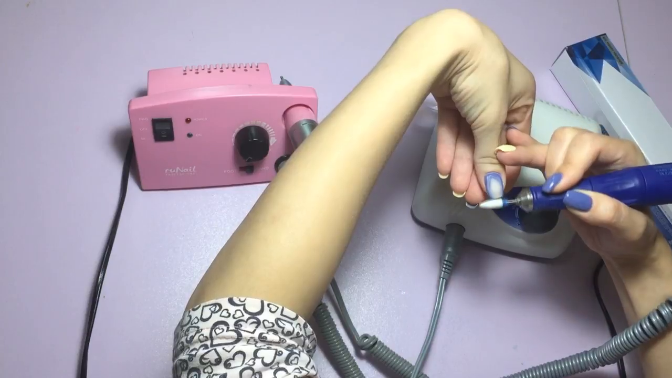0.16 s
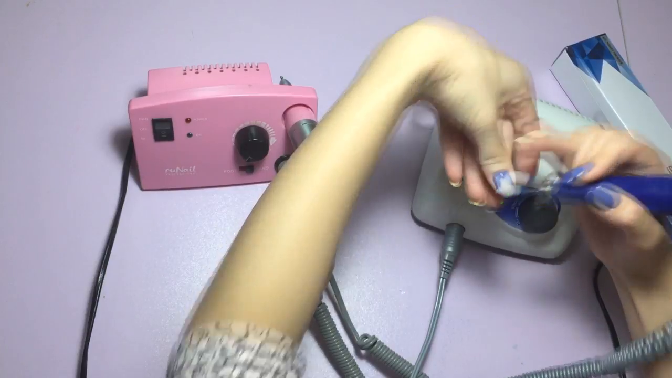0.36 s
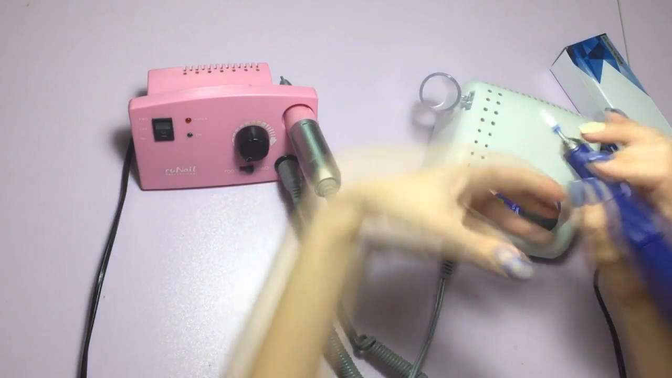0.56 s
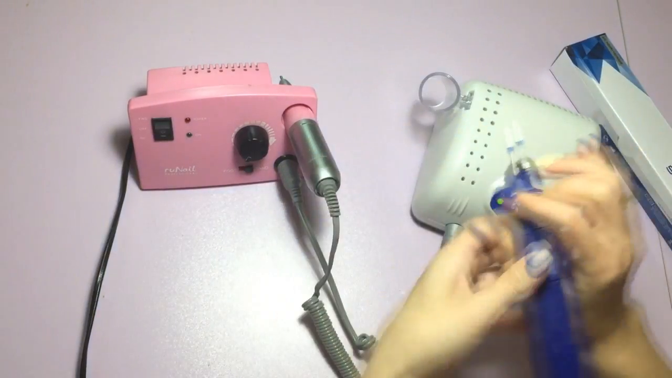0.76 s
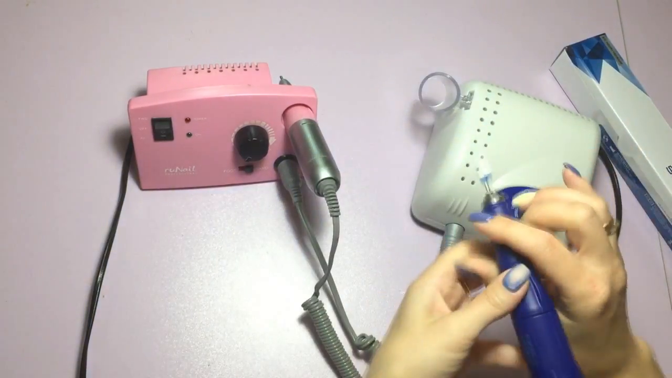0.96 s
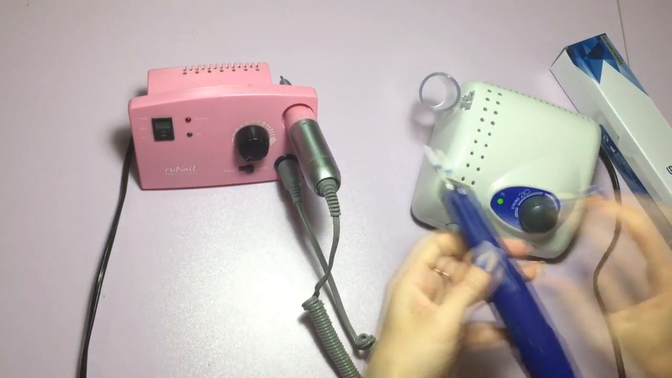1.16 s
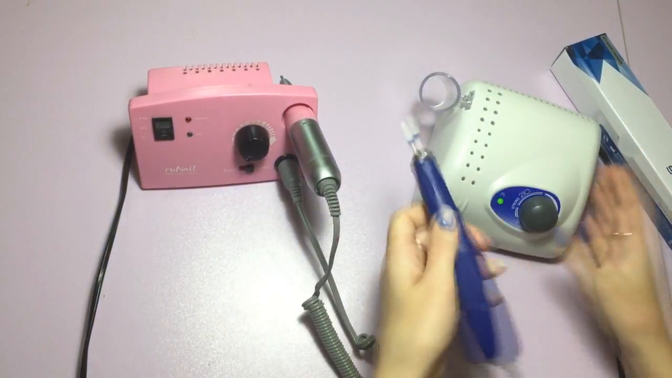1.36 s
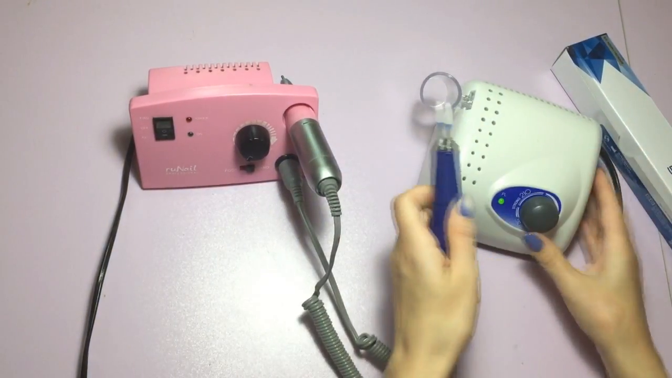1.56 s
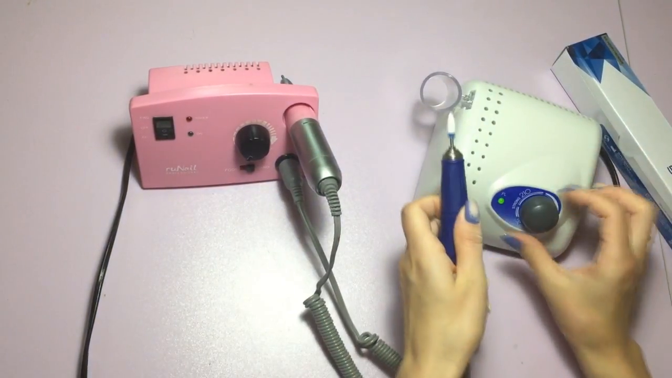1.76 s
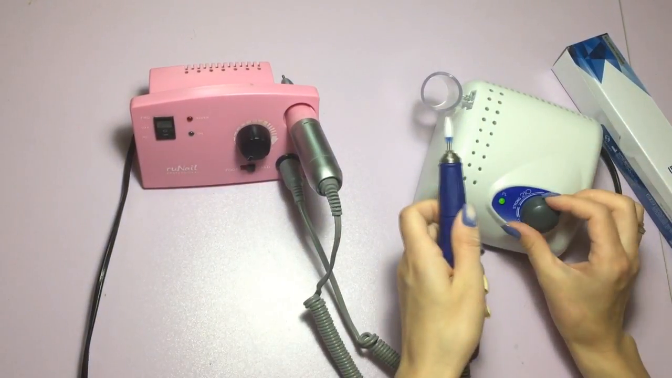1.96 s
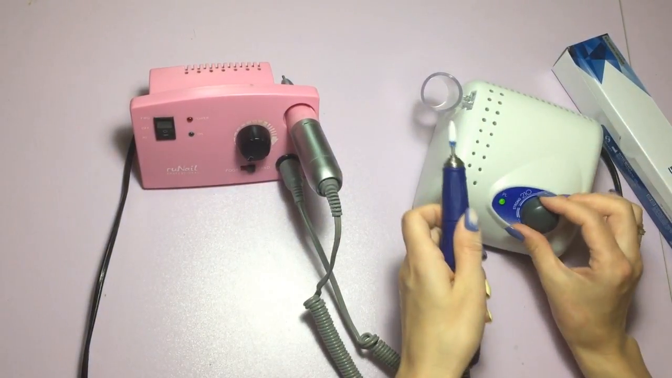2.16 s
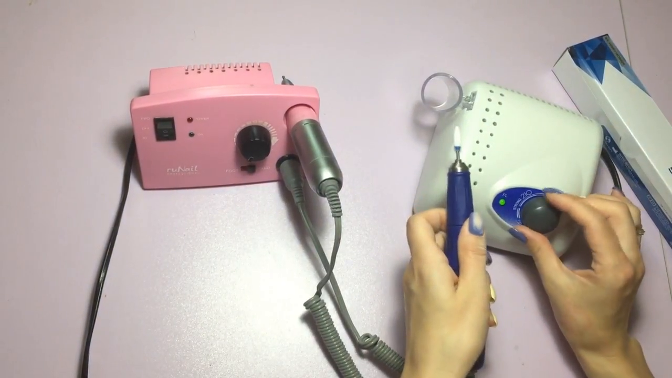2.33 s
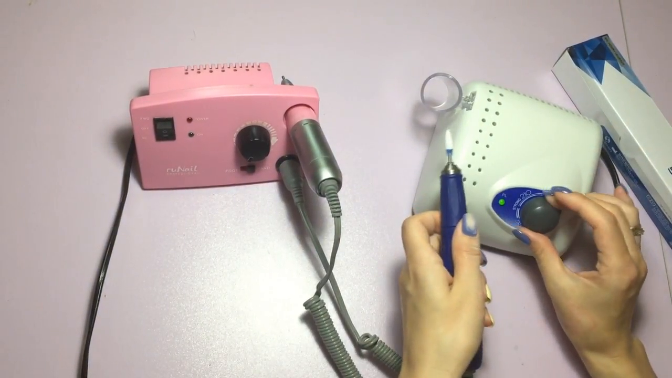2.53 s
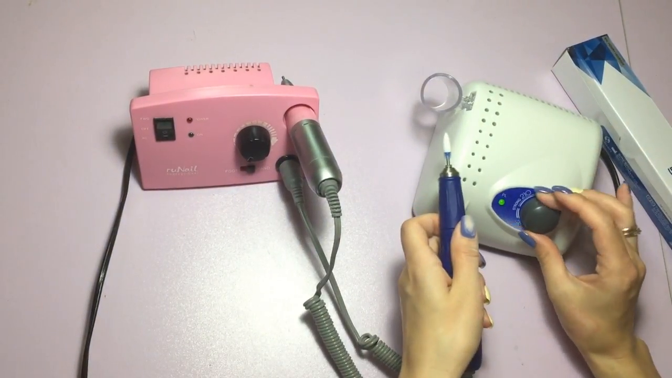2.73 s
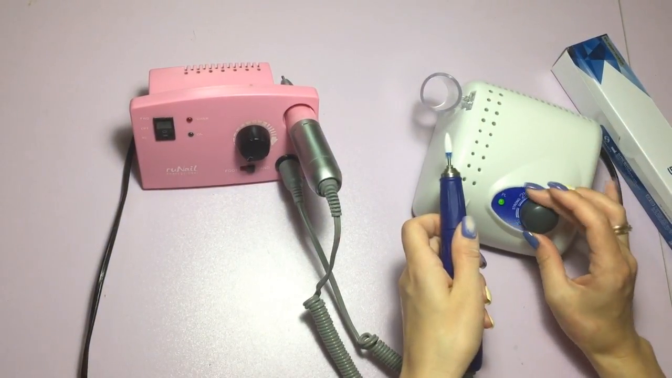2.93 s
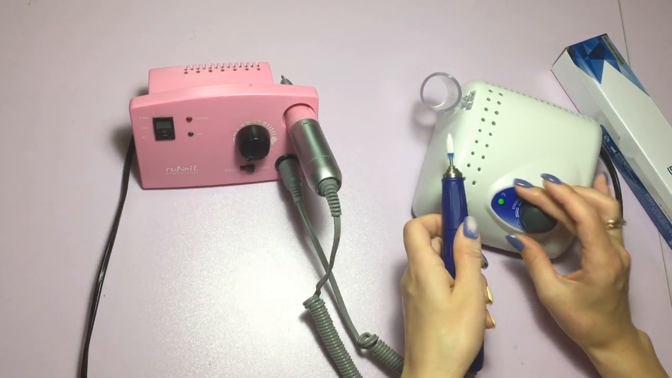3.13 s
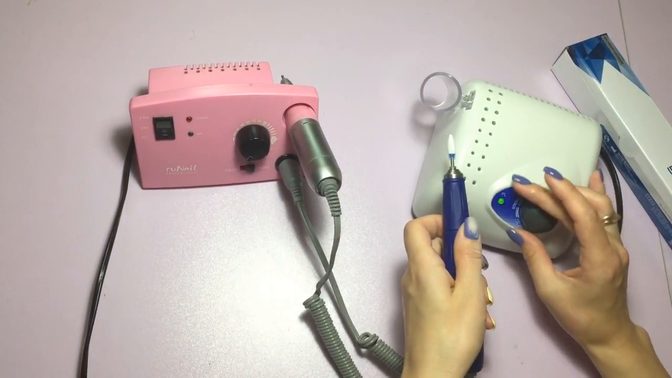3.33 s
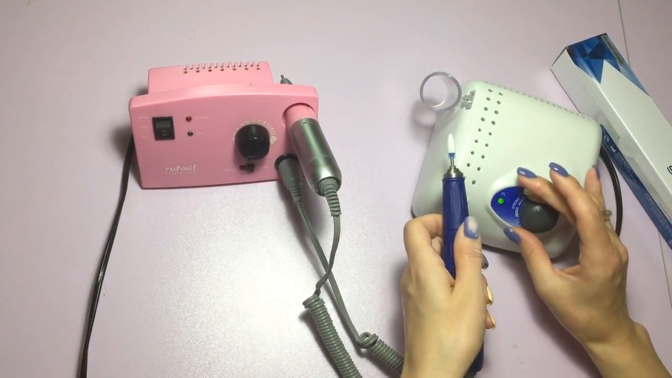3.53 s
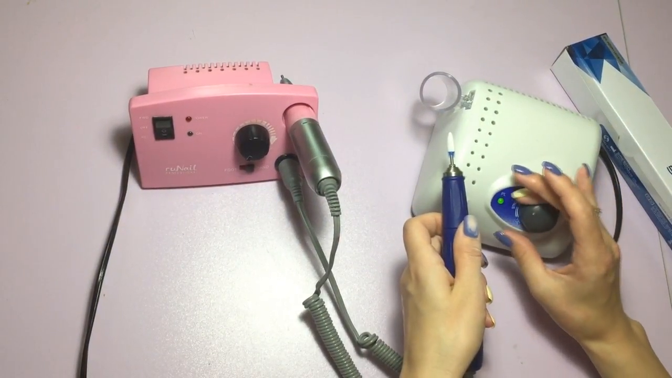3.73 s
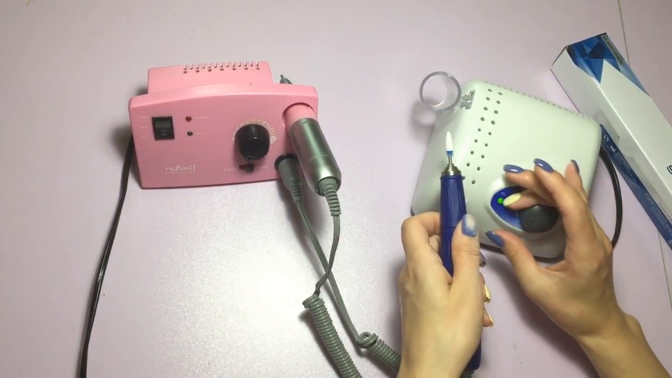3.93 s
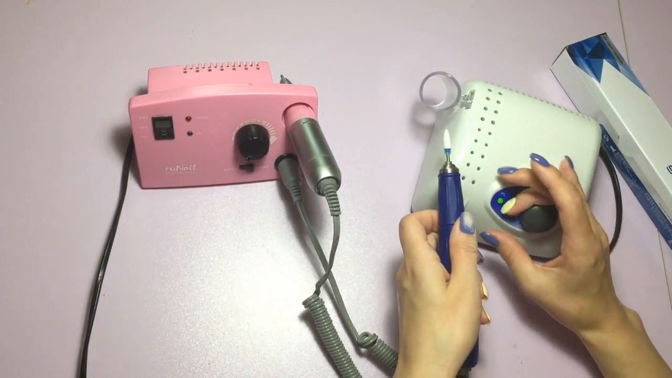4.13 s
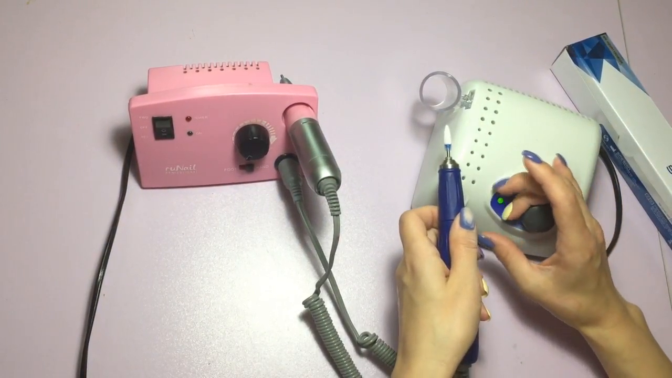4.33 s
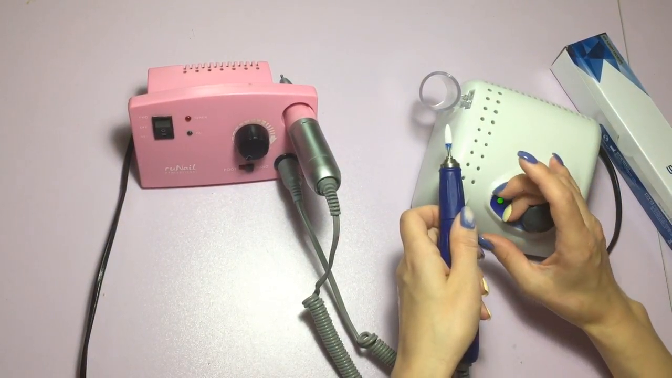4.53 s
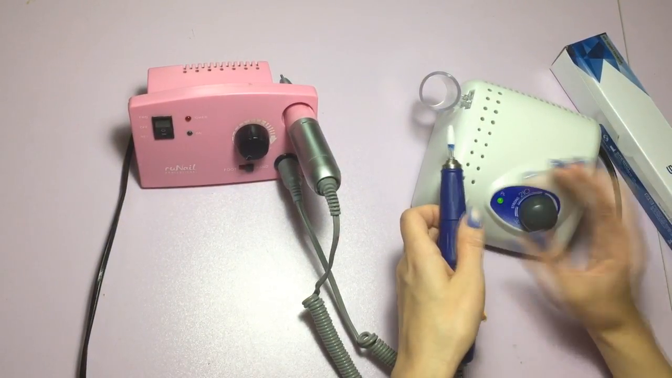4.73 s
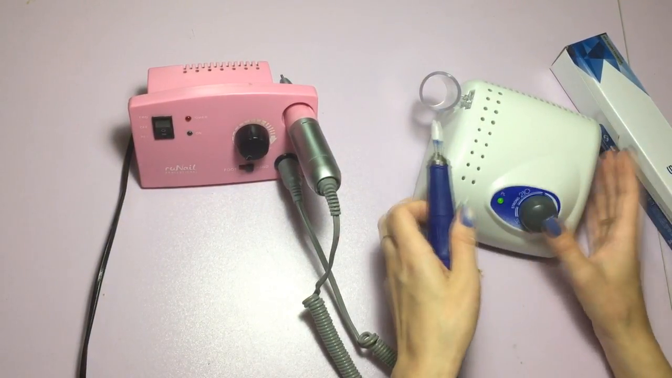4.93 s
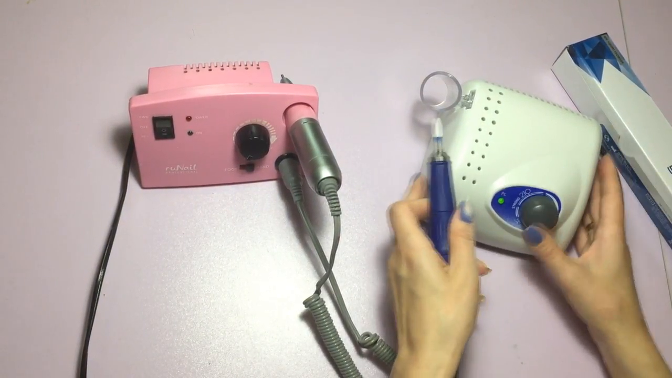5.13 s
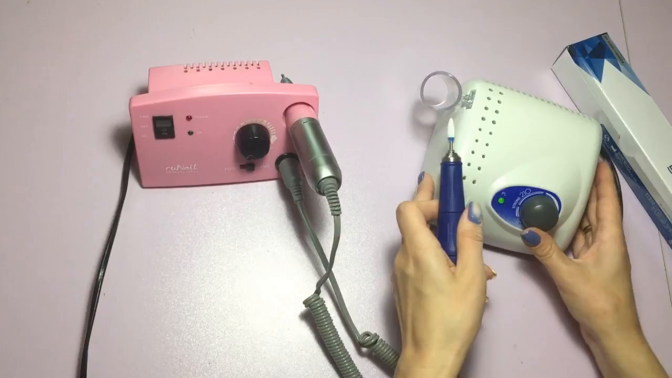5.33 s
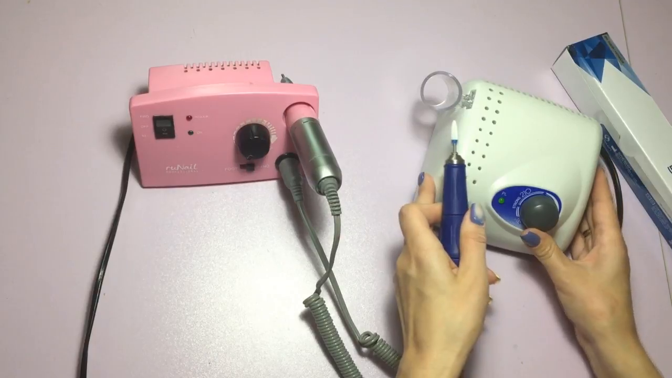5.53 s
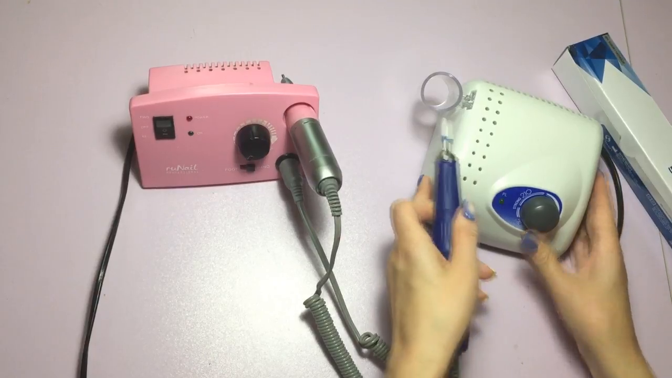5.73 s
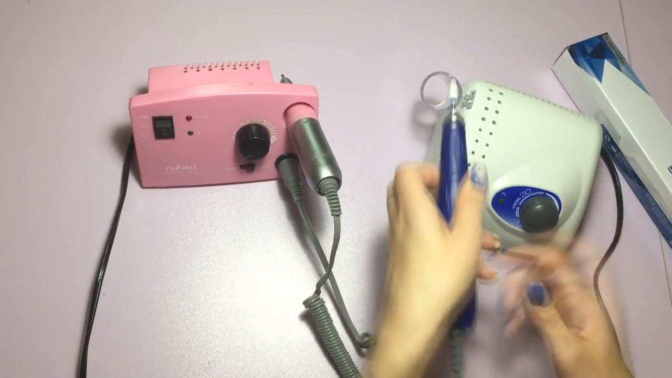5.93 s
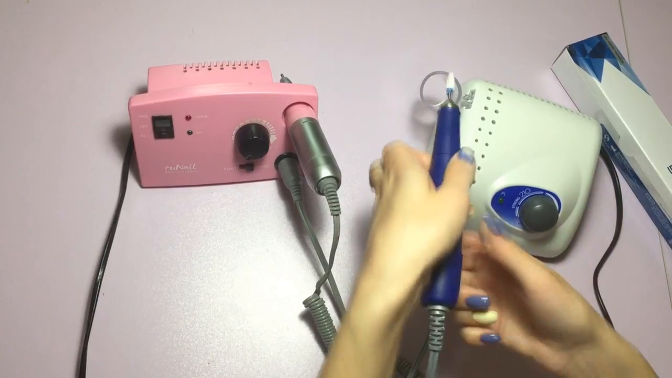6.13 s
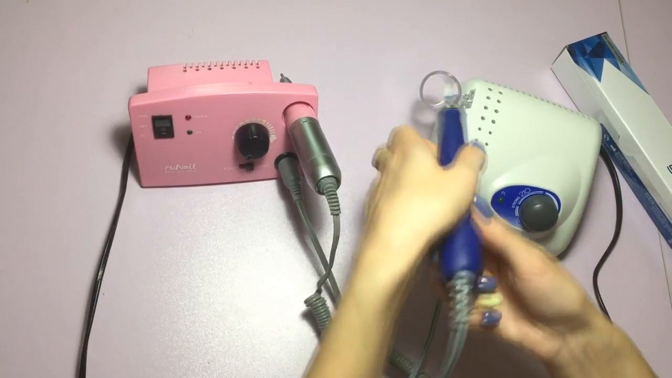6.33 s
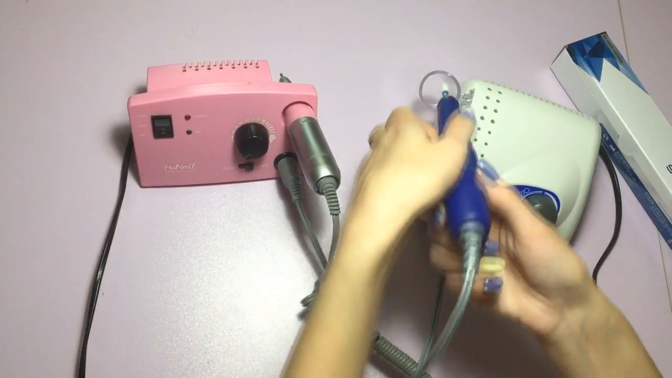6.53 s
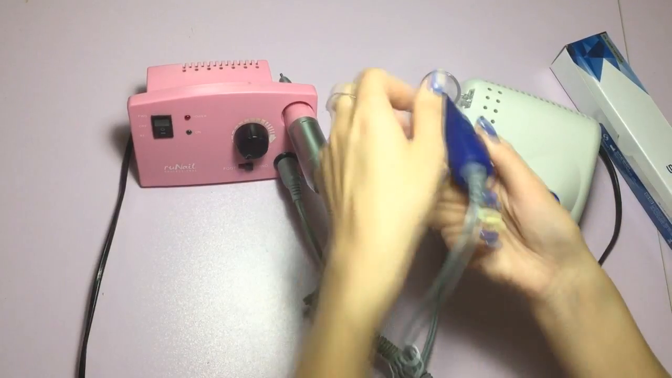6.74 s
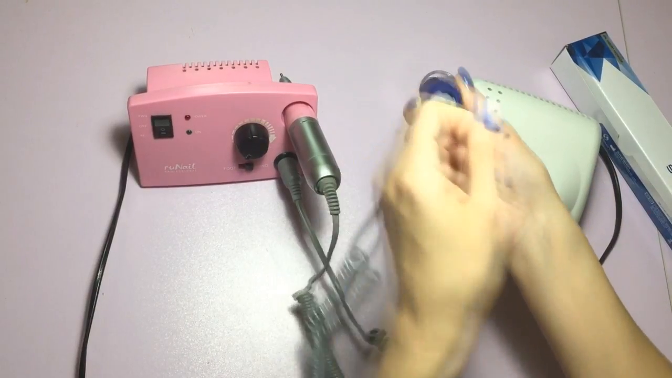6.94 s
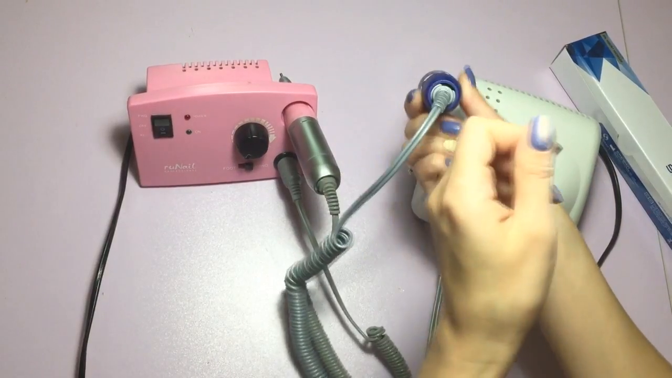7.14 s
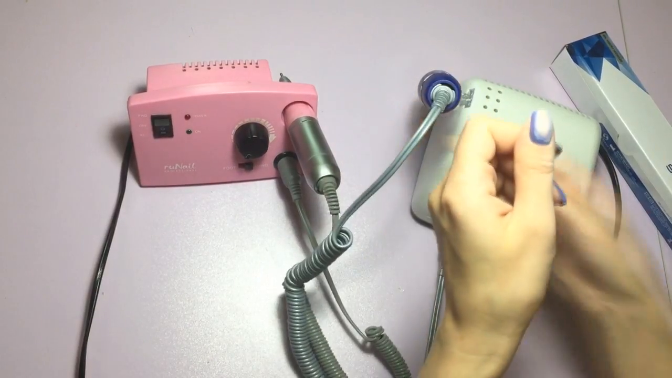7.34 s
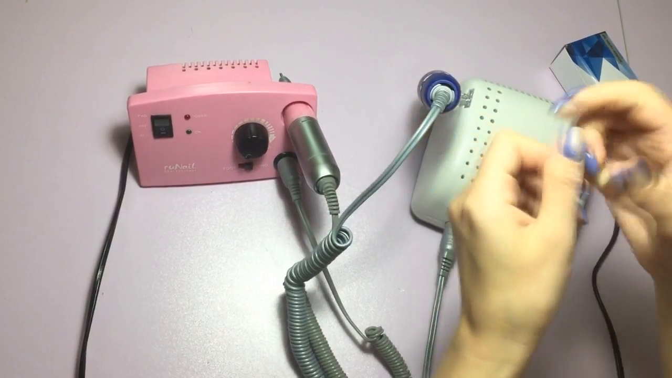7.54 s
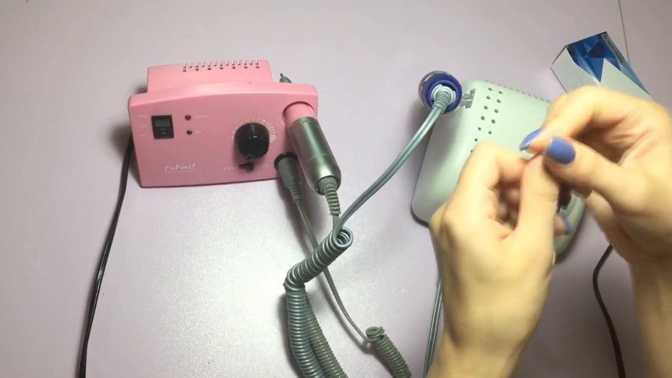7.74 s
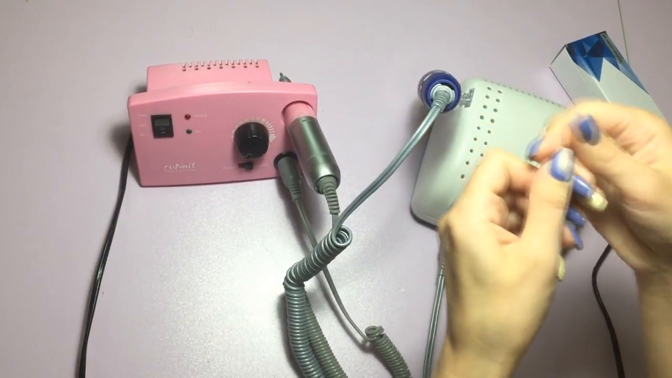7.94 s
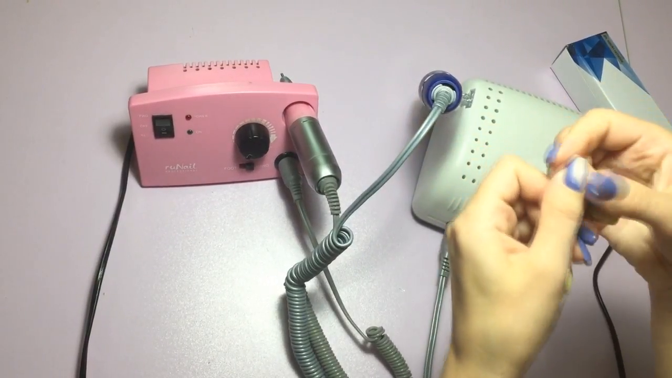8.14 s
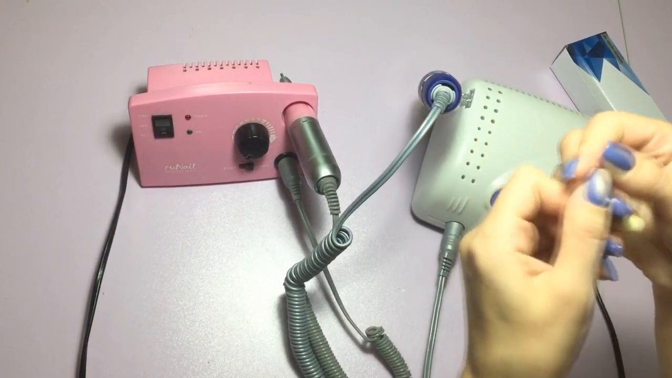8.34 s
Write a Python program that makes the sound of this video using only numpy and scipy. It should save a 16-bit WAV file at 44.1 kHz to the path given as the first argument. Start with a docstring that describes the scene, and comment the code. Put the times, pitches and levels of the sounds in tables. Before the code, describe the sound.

Close to the microphone in a small room, a nail drill whines at high speed, its bit briefly rasping on a nail. It spins freely, then slows in a long falling tone, with a switch click near the end. The handpiece taps against a plastic box on a desk and is pushed into its holder with hollow knocks and a short scrape. Fingers tick softly over faint mains hum and hiss.

```python
"""Nail drill on a desk

Close to a mono camera microphone in a small room, a nail drill whines: its bit grinds a nail briefly,
it runs free, then coasts to a stop, shaft tones and bearing noise sounding through shell and nose.
A switch snaps, the handpiece is knocked and slid into the cradle of its plastic box, and fingers tick.
The room answers the handling; mains hum and hiss lie underneath."""
import sys
import numpy as np
from scipy import signal
from scipy.fft import rfft, irfft, next_fast_len
from scipy.io import wavfile
from scipy.ndimage import uniform_filter1d

SR = 44100
rng = np.random.default_rng(int(sys.argv[2]) if len(sys.argv) > 2 else 0)


def to_wav(sig):
    """Store sig (one row per channel, or 1-D mono) as 16-bit WAV at the path in sys.argv[1].

    Samples outside -1..1 are clipped; the rate is SR.
    """
    pcm = np.clip(np.atleast_2d(sig), -1, 1) * 32767
    pcm = np.round(pcm).astype(np.int16)
    wavfile.write(sys.argv[1], SR, pcm.T)  # frames by channels


N = 374409
T = np.arange(N) / SR

# Modes of the desk, the plastic box and the handpiece shell.
# Each row: frequency in Hz, relative level in dB, t60 in seconds before added damping.
DESK_MODES = [(55, -18, 0.1), (138, -1.5, 0.14), (180, -0.5, 0.11), (244.3, -2, 0.14), (320, -2, 0.13)]
BOX_MODES = [(433, -4, 0.061), (577, 2.5, 0.1), (787, 2.5, 0.017), (932, -5.5, 0.11)]
SHELL_MODES = [(1189, 6, 0.03), (1330, 6.5, 0.028), (1629, -3, 0.18), (1860, -5.5, 0.065),
               (2122, -1.5, 0.038), (2510, -8, 0.1), (2970, -3.5, 0.024), (3420, -7, 0.12),
               (3990, -9, 0.039)]


def amp(db):
    """Decibels to amplitude."""
    return np.exp(np.asarray(db) * (np.log(10) / 20))


def unit(x):
    """x at rms 1."""
    return x / np.sqrt(np.mean(x ** 2) + 1e-20)


def along(points, hz):
    """Read (Hz, value) points on a log axis."""
    f, v = np.transpose(points)
    return np.interp(np.log(hz + 1), np.log(f + 1), v)


def curves(rows):
    """One value per sample for each column after the time."""
    s, *cols = np.transpose(rows)
    return [np.interp(T, s, c) for c in cols]


def bump(s, width):
    """A bell-shaped envelope centred on s."""
    return np.exp(-.5 * ((T - s) / width) ** 2)


def wobble(rate, size=N):
    """A random curve, rate knots a second."""
    knots = rng.standard_normal(int(size * rate / SR) + 2)
    return np.interp(T[:size] * rate, np.arange(len(knots)), knots)


def filtered(x, response):
    """x times a response of frequency."""
    m = next_fast_len(len(x) + 8192)
    return irfft(rfft(x, m) * response(np.fft.rfftfreq(m, 1 / SR)), m)[:len(x)]


def coloured(x, spectrum):
    """x through a spectrum that keeps white noise at its level."""
    scale = np.sqrt(np.mean(amp(along(spectrum, np.linspace(0, SR / 2, 4096))) ** 2))
    return filtered(x, lambda hz: amp(along(spectrum, hz)) / scale)


def band(lo_hz, hi_hz, size=N):
    """Noise of rms 1 with soft band edges."""
    edges = lambda f: 1 / np.sqrt((1 + (lo_hz / (f + 1)) ** 4) * (1 + (f / hi_hz) ** 4))
    return unit(filtered(rng.standard_normal(size), edges))


def patchy(spread_db):
    """White noise with patches of random gain."""
    z = signal.stft(rng.standard_normal(N + 512), nperseg=512)[2]
    field = uniform_filter1d(uniform_filter1d(rng.standard_normal(z.shape), 6, 0), 8, 1)
    return unit(signal.istft(z * amp(spread_db * unit(field)), nperseg=512)[1][:N])


def scattered(multiples, trend, spread_db=3.5):
    """Rows (multiple, dB, ..) lying at random about a trend."""
    k, *cols = np.transpose(trend)
    db = np.transpose([np.interp(multiples, k, c) for c in cols])
    return np.c_[multiples, db + spread_db * rng.standard_normal((len(multiples), 1))]


def order(multiple, db, speed, flicker_db=3.5):
    """A flickering sine locked to the shaft, muted above about 16 kHz; db is its rms."""
    turns = np.cumsum(speed) / SR
    heard = multiple * speed < SR / 2.7
    level = np.sqrt(2) * amp(db + flicker_db * wobble(9, len(speed)))
    return heard * level * np.sin(2 * np.pi * (multiple * turns + rng.random()))


def shaft_tones(speed, stages_hz):
    """The whine: tones at multiples of the shaft speed, their balance shifting as it slows."""
    # Prominent orders, and the trend of the rest. Each row: multiple, relative dB at each stage.
    prominent = [(1, -22, -34, -33), (2, -30, -25, -47), (3, -28, -16, -24), (4, -22, -22, -23),
                 (5, -30, -40, -24), (6, -21, -33, -27), (7, -31, -32, -24), (8, -23, -23, -33),
                 (9, -19, -27, -29), (10, -12, -15, -30), (11, -23, -21, -33), (12, -20, -22, -47),
                 (21, -20, -17, -20), (33, -18, -18, -23), (35, -15, -15, -25), (37, -21, -21, -21),
                 (42, -19, -19, -22), (43, -15, -15, -22), (49, -22, -22, -22), (55, -20, -20, -20)]
    trend = [(13, -25, -24, -35), (26, -24, -22, -35), (28, -20, -20, -35), (45, -22, -22, -30),
             (47, -27, -27, -26), (80, -27, -27, -25), (96, -33, -33, -33)]
    # A part turning at a third of the shaft speed. Each row: multiple, relative dB.
    third_trend = [(8.3, -26), (11.3, -26), (12.3, -20), (19.7, -22), (21, -28), (26.7, -28)]
    # The 10th order swells and recedes. Each row: time in seconds, change in dB.
    whistle = [(.3, -0.5), (.65, 1.5), (.9, 0), (1.25, 5.5), (1.7, -2), (2, -7.5), (2.7, -7), (3.3, 3.5),
               (3.5, 6.5), (3.75, -11)]
    others = np.setdiff1d(np.arange(trend[0][0], trend[-1][0] + 1), [row[0] for row in prominent])
    tones, end = np.zeros(N), len(speed)
    for k, *stage_db in [*prominent, *scattered(others, trend)]:
        db = np.interp(speed, stages_hz[::-1], stage_db[::-1])
        if k == 10:
            db += curves(whistle)[0][:end]
        tones[:end] += order(k, db, speed)
    fast = np.clip((speed - 500) / 60, 0, 1)
    last = np.count_nonzero(fast)
    for k, db in scattered([n / 3 for n in range(25, 81) if n % 3], third_trend):
        tones[:last] += fast[:last] * order(k, db, speed[:last], flicker_db=4)
    return tones


def drill():
    """Bearing noise and shaft tones shake the shell, the nose and the air around the bit."""
    # The shaft: loaded by the nail, free, turned down. Each row: time in seconds, turns a second.
    shaft_speed = [(0, 585.8), (.15, 581.7), (.27, 583.1), (.51, 595.6), (.69, 599), (2.1, 600.6),
                   (2.31, 598), (2.49, 592.5), (2.67, 576.3), (2.85, 549.5), (3.03, 516.1), (3.39, 445.4),
                   (4.35, 264.7), (4.83, 178.6), (5.22, 112.4), (5.45, 76.6), (5.75, 30)]
    # Shaft speeds in Hz of three stages: full, slowing, slow.
    stages_hz = [550, 400, 250]
    # Lift of tones over noise. Each row: dB at each stage; first for shell and nose, then for hiss.
    lift = [
        [0, 0, 0],
        [0, 5, 9.5],
    ]
    # The level falls with speed. Each row: shaft Hz, then shell, nose and hiss in dB.
    rundown = [(45, -83, -80, -78.5), (99, -72, -73.5, -73), (134, -70.5, -73, -73), (166, -60, -66.5, -72),
               (192, -55.5, -59.5, -65), (266.4, -46, -55, -58.5), (325, -42.5, -50.5, -57),
               (420, -42, -46.5, -55.5), (500, -34, -45.5, -48.5), (600, -33, -43, -43.5)]
    # The hand turns the drill. Each row: time in seconds, change of shell, nose and hiss in dB.
    hold = [(0, -4, 1, 1.5), (.11, -4.5, -2, 3.5), (.31, -6, -5, -3), (.52, -6, -.5, -1), (.99, -3, -.5, 2),
            (1.31, -2.5, -0.5, -1.5), (1.39, -4, -1.5, 0), (1.67, -.5, 0.5, -1.5), (2.01, 0.5, 1.5, -1)]
    # Each row: time in seconds, share held low over the desk from 0 to 1.
    lowering = [(0, 0), (1.5, 0), (1.64, 1), (5.75, 1)]
    # Spectra of the radiating parts. Each row: frequency in Hz, relative level in dB.
    shell_raised = [(350, -62.5), (600, -28), (919, -22.5), (1180, -4.5), (1500, -2.5), (1740, 1.5),
                    (2390, 3.5), (2590, 1), (3480, 0.5), (3760, -1), (5000, -5), (6500, -78), (11000, -120)]
    shell_lowered = [(350, -71.5), (600, -32.5), (833, -26.5), (1360, -11), (1560, -11), (1850, 0),
                     (2080, -8.5), (2330, -3.5), (2780, -3.5), (3070, 2.5), (3480, 1.5), (3830, -6.5),
                     (5000, -18), (6500, -65.5), (11000, -120)]
    shell_coasting = [(350, -54), (600, -50), (769, -13), (943, -24), (1010, -6), (1100, -12), (1390, -2.5),
                      (1650, -2.5), (1820, 9), (2210, -0.5), (3440, 6.5), (4500, -14.5), (5000, -46),
                      (6500, -66), (11000, -120)]  # only its hollows ring
    metal_nose = [(2880, -24), (4900, -6.5), (5230, 3.5), (5660, 6), (5880, 3.5), (6170, 5), (6340, -6.5),
                  (6600, 0.5), (7650, -2), (8790, -14.5), (9300, -23), (12100, -49.5), (20500, -120)]
    fast_hiss = [(5180, -30), (8800, 3), (9690, 3.5), (10400, 0.5), (11400, 2.5), (13200, -1.5),
                 (14900, -4.5), (15900, -1.5)]
    slow_hiss = [(5180, -51.5), (8800, -16), (9200, 2.5), (10200, -1), (12700, 1), (13800, 4), (15100, 4.5),
                 (15900, 7.5)]
    # The 21st order sings out twice. Each row: centre and width in seconds, level in dB.
    late_whine = [(4.57, 0.085, -64), (5.337, 0.092, -71.5)]

    stop_s = 5.66
    end = round(stop_s * SR)
    shaft = curves(shaft_speed)[0]
    speed = shaft[:end]
    hz, *fall_db = np.transpose(rundown)
    shell_db, nose_db, hiss_db = (np.interp(shaft, hz, db) + held
                                  for db, held in zip(fall_db, curves(hold)))
    body_lift_db, air_lift_db = (np.interp(shaft, stages_hz[::-1], row[::-1]) for row in lift)

    tones = shaft_tones(speed, stages_hz)
    gliding = np.clip((590 - shaft) / 60, 0, 1)
    tones = (1 - gliding) * tones + gliding * resonances(tones)
    bearings = patchy(spread_db=1.5) * amp(0.13 * wobble(24.93))
    shake = bearings + amp(body_lift_db) * tones
    stir = bearings + amp(air_lift_db) * tones

    low = curves(lowering)[0]
    slow = np.clip((480 - shaft) / 140, 0, 1)
    shell = np.sqrt(1 - low) * coloured(shake, shell_raised)
    shell += np.sqrt(low * (1 - slow)) * coloured(shake, shell_lowered)
    shell += np.sqrt(slow) * coloured(shake, shell_coasting)
    air = np.sqrt(1 - slow) * coloured(stir, fast_hiss) + np.sqrt(slow) * coloured(stir, slow_hiss)
    out = amp(shell_db) * shell + amp(nose_db) * coloured(shake, metal_nose)
    out += amp(hiss_db + 0.99 * wobble(12)) * air
    whine = sum(amp(db) * bump(s, width) for s, width, db in late_whine)
    out[:end] += whine[:end] * order(21, 0, speed, flicker_db=1.5)
    return out * (T < stop_s) + grinding(speed) + rasp_swells(bearings)


def resonances(x, ripple_db=4, step_hz=250):
    """Gliding tones flare and sink through broad peaks and many small, random treble resonances."""
    # Each row: frequency in Hz, gain in dB.
    peaks = [(500, -8), (750, 2), (1100, -2), (1300, 6), (1480, 8), (1650, -4), (3600, -7), (4300, -1),
             (4700, -5), (5300, 0), (6000, -3), (8000, 0), (16000, 1)]
    knots = rng.standard_normal(int(SR / 2 / step_hz) + 2)
    ripple = lambda hz: np.clip(hz / 4000, 0, 1) * np.interp(hz / step_hz, np.arange(len(knots)), knots)
    return filtered(x, lambda hz: amp(along(peaks, hz) + ripple_db * ripple(hz)))


def grinding(speed):
    """The flutes of the bit strike the nail in step with the shaft and throw off dust."""
    # Each row: time in seconds, then low, middle and high flute tones and dust hiss in dB.
    cut = [(0.0, -46, -50.5, -53.5, -46), (0.042, -37.5, -40.5, -53, -46.5), (0.15, -41.5, -34, -31.5, -38),
           (0.188, -49.5, -36, -30.5, -38.5), (0.26, -51.5, -30.5, -36.5, -39.5),
           (0.296, -53.5, -55, -35.5, -46), (0.31, -52, -60.5, -49, -61), (0.34, -58, -61, -56, -59.5)]
    # Each row: multiple of the shaft speed, dB relative to its group.
    flutes = [(5, -1.5), (7, -8), (9, -4), (10, -12), (11, -8), (12, -7.5), (13, -19), (15, -14.5),
              (16, 2.5), (17, -6), (18, -18.5), (19, -18.5), (20, -0.5), (21, -11.5), (22, -15.5),
              (23, -16), (24, -15.5), (25, -9), (26, -21), (27, -18)]
    *group_db, dust_db = curves(cut)
    out, end = amp(dust_db) * band(6000, 15000), len(speed)
    for k, db in flutes:
        group = np.searchsorted([10.5, 18.5], k)
        out[:end] += amp(group_db[group][:end]) * order(k, db, speed)
    return out * np.clip((cut[-1][0] - T) / .03, 0, 1)


def background():
    """Hiss, wavering mains hum and, later, rustling hands and sleeves."""
    # Each row: frequency in Hz, level in dB (relative for the hiss).
    hiss_spectrum = [(12, -51.5), (20, -18.5), (44, -9), (101, -1), (172, -10), (203, 1.5), (227, -10),
                     (301, -6), (327, -10.5), (398, -8), (470, -11.5), (4280, -20), (15900, -32)]
    mains = [(48.4, -85), (199.2, -79), (301.5, -80), (398.4, -80.5), (500.6, -89.5), (592.2, -88)]
    # Each row: centre and width in seconds, dull and bright noise in dB.
    rustles = [(6.263, 0.037, -95, -74), (6.512, 0.034, -75, -72.5), (6.594, 0.014, -60, -94.5),
               (6.682, 0.044, -76, -87.5), (7.492, .06, -67, -81.5), (7.69, 0.0069, -73.5, -73.5),
               (7.74, 0.087, -75, -102), (7.889, .08, -84, -78), (8.45, .05, -76.5, -78.5)]
    dull, bright = band(390, 1700), band(5000, 15000)
    hands = sum(bump(s, width) * (amp(dull_db) * dull + amp(bright_db) * bright)
                for s, width, dull_db, bright_db in rustles)
    hum = sum(np.sqrt(2) * amp(db + 1.5 * wobble(12)) * np.sin(2 * np.pi * (hz * T + rng.random()))
              for hz, db in mains)
    return amp(-68.5) * coloured(patchy(spread_db=1.8), hiss_spectrum) + hum + hands


def rasp_swells(noise):
    """Narrow bands of the rasp swell briefly as the hand turns."""
    # Each row: centre and width in seconds, centre and width in Hz, level in dB.
    swells = [(0.603, 0.14, 2630, 290, -46), (1.66, 0.025, 3860, 449, -43.5), (3.84, 0.038, 5980, 200, -46)]
    out = 0
    for s, width, hz, width_hz, db in swells:
        narrow = unit(filtered(noise, lambda f: np.exp(-.5 * ((f - hz) / width_hz) ** 2)))
        out += amp(db) * bump(s, width) * narrow
    return out


def ring(modes, t, tilt_db=0):
    """A struck body: its modes decay from new strengths and phases, tilted by tilt_db an octave."""
    middle = np.mean([np.log2(hz) for hz, _, _ in modes])
    out = 0
    for hz, db, t60 in modes:
        gain = amp(db + tilt_db * (np.log2(hz) - middle) + rng.normal(0, 2.2))
        cycles = hz * t * rng.normal(1, 0.015) + rng.random()
        out += gain * amp(-60 * t / t60) * np.sin(2 * np.pi * cycles)
    return out


def contacts():
    """Soft bumps ring box and desk, knocks add the shell and a snap; fingers and switch tick dryly."""
    # Bumps of hand and cord. Each row: start in seconds, box and desk in dB.
    thumps = [(0.712, -47, -44), (1.269, -54.5, -52.5), (2.075, -47, -56.5), (5.193, -53, -69)]
    # Each row: start in seconds, box, desk, shell and snap in dB, hand damping in dB per 10 ms.
    knocks = [(4.813, -50, -77.5, -45, -70, 7.5), (5.689, -44.5, -35.5, -38.5, -26, 4.5),
              (5.843, -47.5, -62, -63, -86, 8), (5.898, -52, -47, -64, -85, 11),
              (5.918, -59, -75, -65, -90, 7), (6.504, -78, -72, -65, -76.5, 7),
              (6.563, -77, -68, -62, -81, 1), (6.593, -65.5, -70, -57, -85, 3),
              (6.771, -70, -54.5, -61.5, -76, 6), (6.822, -22, -19.5, -26.5, -61.5, 0.9),
              (6.968, -29, -41, -30.5, -58.5, 3), (7.031, -35.5, -48.5, -43, -62, 4.5),
              (7.054, -38.5, -51.5, -42.5, -65, -1.5), (7.127, -17.5, -31.5, -26.5, -44.5, 7),
              (7.142, -25.5, -32, -23, -45, 13), (7.165, -44.5, -26, -34.5, -49.5, 3)]
    # Each row: start in seconds, bright and dull noise in dB.
    finger_ticks = [(7.6884, -56, -65), (7.7283, -60, -71), (7.8535, -57.5, -76), (8.4515, -47, -46),
                    (8.4614, -62.5, -49)]
    # The knob's switch, with the first knock: level in dB, band edges in Hz, t60 in seconds.
    switch = (-37, 1500, 3300, .018)
    out, t = np.zeros(N + SR), T[:SR // 3]
    rise = lambda seconds: 1 - np.exp(-t / seconds)
    decay = lambda t60: amp(-60 * t / t60)
    noise = lambda lo_hz, hi_hz: band(lo_hz, hi_hz, len(t))

    def add(s, sound):
        out[round(s * SR):][:len(t)] += sound

    for s, box_db, desk_db in thumps:
        thump = amp(box_db) * ring(BOX_MODES, t) + amp(desk_db) * ring(DESK_MODES, t)
        add(s, thump * rise(0.00077) * decay(0.063))
    for s, box_db, desk_db, shell_db, snap_db, damp_db in knocks:
        box = amp(box_db) * ring(BOX_MODES, t) * rise(0.0006)
        desk = amp(desk_db) * ring(DESK_MODES, t, tilt_db=0.5) * rise(0.0086)
        tilt_db = 0.5 + 0.18 * (shell_db - box_db)  # brighter as the shell outweighs the box
        shell = ring(SHELL_MODES, t, tilt_db) * rise(0.00027) * decay(0.11)  # the grip shortens it
        shell += noise(890, 2700) * rise(.0006) * decay(0.027)
        damping = amp(-max(damp_db, 0) * t / .01)
        snap = amp(snap_db) * noise(2600, 14000) * rise(.0007) * decay(0.016)
        add(s, (box + desk + amp(shell_db) * shell) * damping + snap)
    for s, bright_db, dull_db in finger_ticks:
        tick = amp(bright_db) * noise(7000, 15000) + amp(dull_db) * noise(2500, 2200)
        add(s, tick * decay(.016))
    db, lo_hz, hi_hz, t60 = switch
    click = unit(filtered(noise(lo_hz, hi_hz), lambda f: 1 / (1 + (f / 5000) ** 6)))
    add(knocks[0][0], amp(db) * click * decay(t60))
    return out[:N]


def rubbed(modes, width_hz, top_hz):
    """Gritty noise through the resonances of a body."""
    body = lambda f: sum((-1) ** k * amp(db) * 1j * f * width_hz / (hz * hz - f * f + 1j * f * width_hz)
                         for k, (hz, db, _) in enumerate(modes))
    grit = amp(3.6 * wobble(90)) * rng.standard_normal(N)
    return unit(filtered(grit, lambda f: body(f) / (1 + (f / top_hz) ** 6)))


def slides():
    """Uneven friction: a hand shifts the box on the desk; later the handpiece slides into its cradle."""
    # The box shifts: peak in dB, rise and fall in dB a second.
    shift = (-52, 150, 95)
    # Each row: time in seconds, then box, shell and scrape in dB.
    cradle = [(6.975, -29, -25, -57), (6.985, -36, -40, -68.5), (7.015, -47, -42.5, -73.5),
              (7.09, -44, -37, -73), (7.115, -34, -34, -61.5), (7.133, -27, -31, -54),
              (7.171, -52.5, -49.5, -56), (7.28, -71, -68, -90.5)]
    box = rubbed(DESK_MODES + BOX_MODES, width_hz=45, top_hz=1100)
    shell = rubbed(SHELL_MODES, width_hz=70, top_hz=4300)
    peak_db, rise_db, fall_db = shift
    peak_s = 1.654
    drag = box * amp(peak_db - np.maximum(rise_db * (peak_s - T), fall_db * (T - peak_s)))
    box_db, shell_db, scrape_db = curves(cradle)
    slide = amp(box_db) * box + amp(shell_db) * shell + amp(scrape_db) * band(5400, 13000)
    gate = np.clip(np.minimum(T - cradle[0][0], cradle[-1][0] - T) / .01, 0, 1)
    return drag + gate * slide


def room(x):
    """The small room's answer, its treble dying first."""
    # Each row: frequency in Hz, t60 in seconds.
    decay_times = [(150, .3), (1000, 0.25), (4000, 0.19), (12000, 0.14)]
    hz, t, z = signal.stft(rng.standard_normal(SR // 2), SR, nperseg=256)
    tail = signal.istft(z * amp(-60 * t / along(decay_times, hz)[:, None]), SR, nperseg=256)[1]
    return signal.fftconvolve(np.pad(x, (250, 0)), tail / np.linalg.norm(tail))[:N]


def scene():
    """Drill, handling and background at the microphone, the same on both channels."""
    handling = contacts() + slides()
    handling += amp(-7) * room(handling)
    # Small bodies radiate no deep bass.
    handling = filtered(handling, lambda hz: 1 / (1 + (45 / (hz + 1)) ** 4))
    mono = drill() + handling + background()
    return np.array([mono, mono])


def record(dry):
    """The camera keeps nothing above its band limit."""
    return np.array([filtered(side, lambda hz: hz < 15830) for side in dry])


dry = scene()
out = record(dry)
to_wav(out)
```